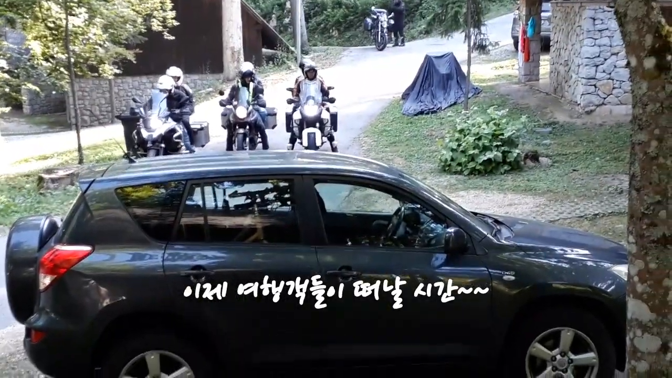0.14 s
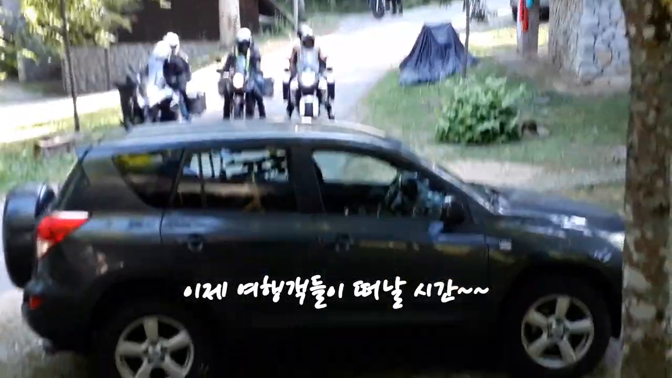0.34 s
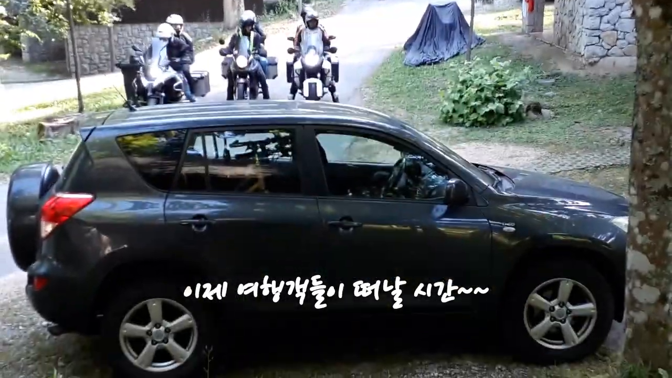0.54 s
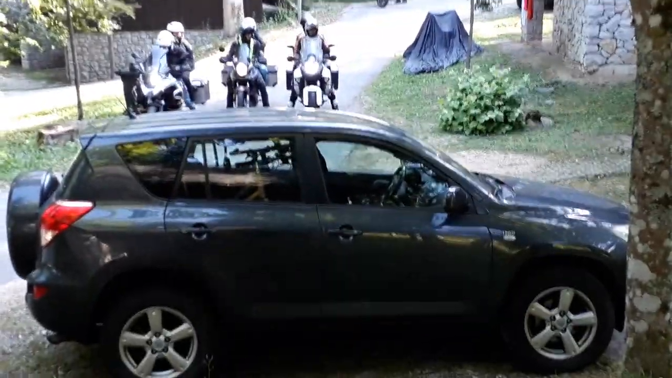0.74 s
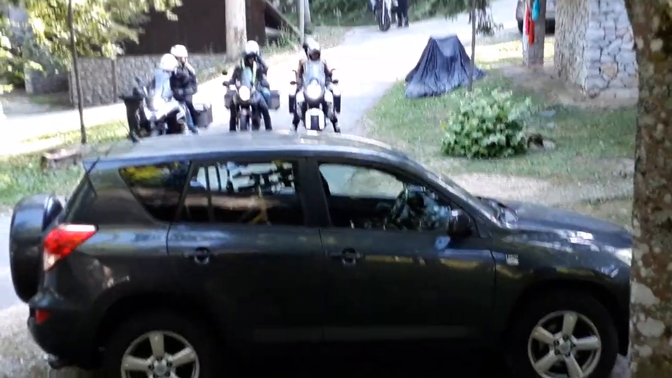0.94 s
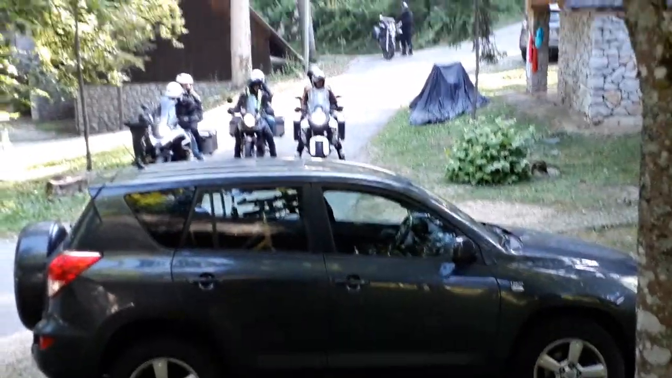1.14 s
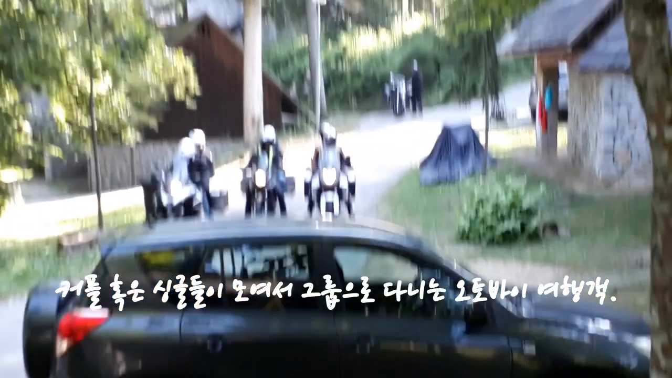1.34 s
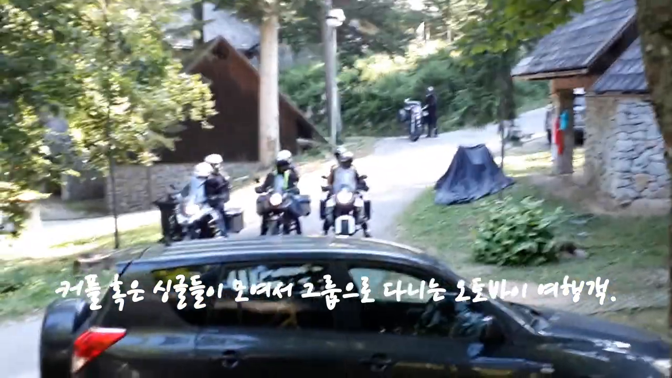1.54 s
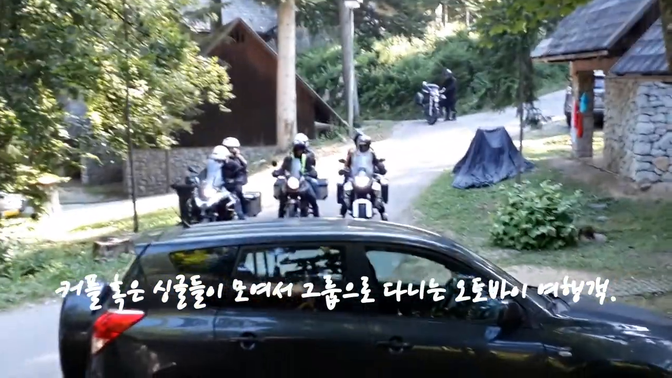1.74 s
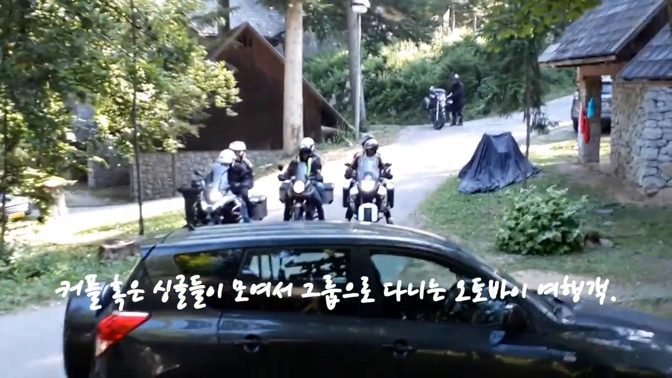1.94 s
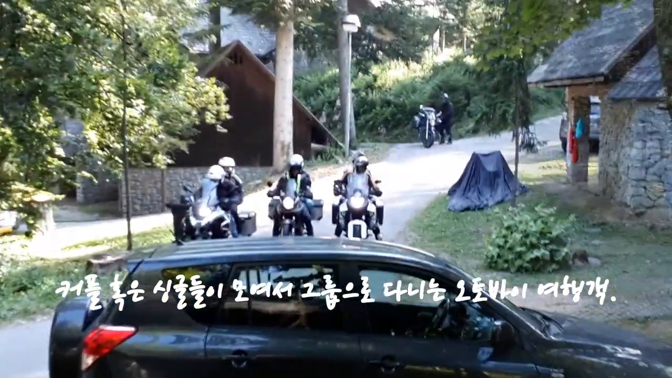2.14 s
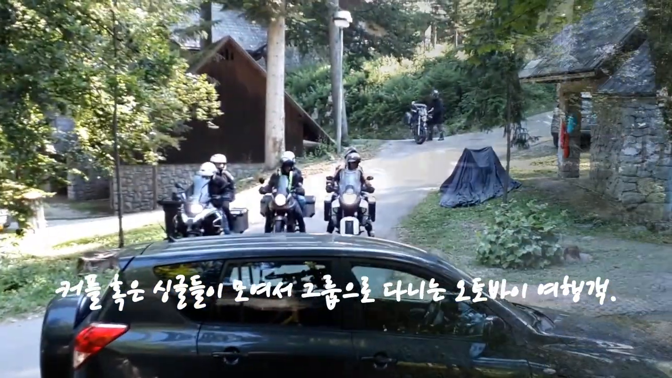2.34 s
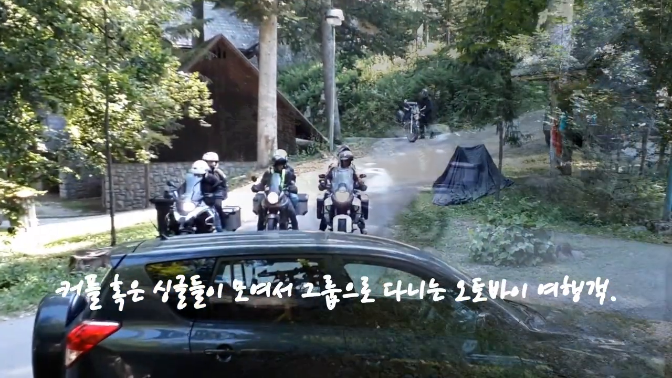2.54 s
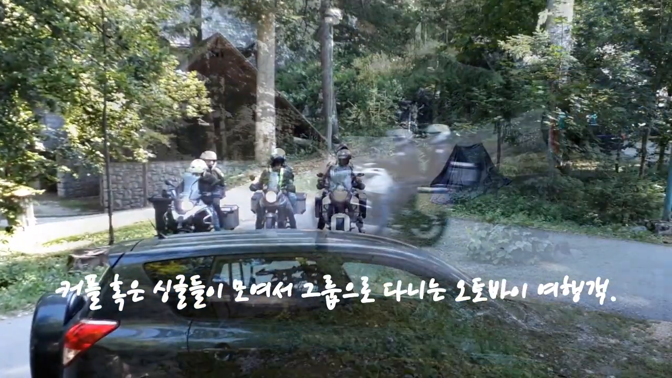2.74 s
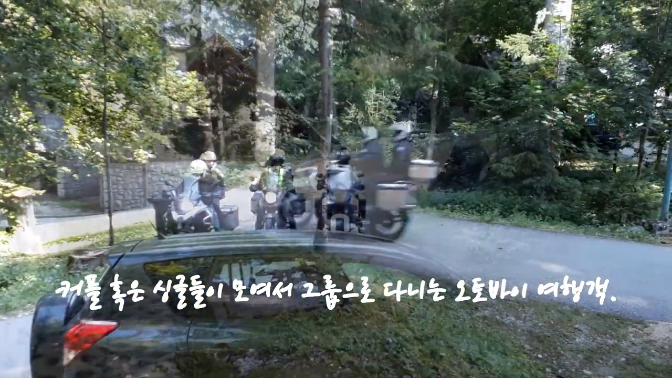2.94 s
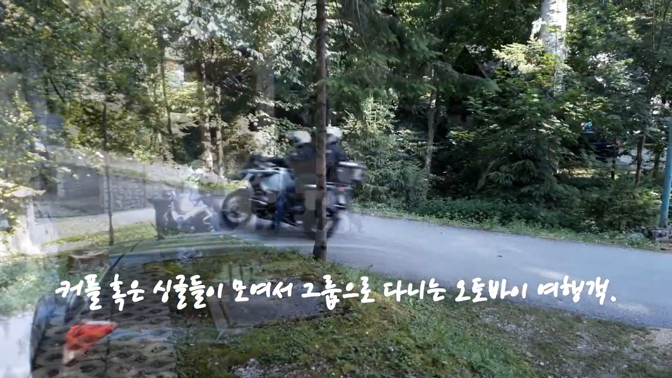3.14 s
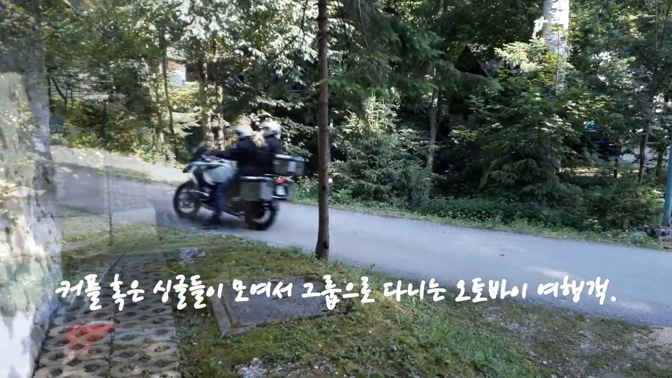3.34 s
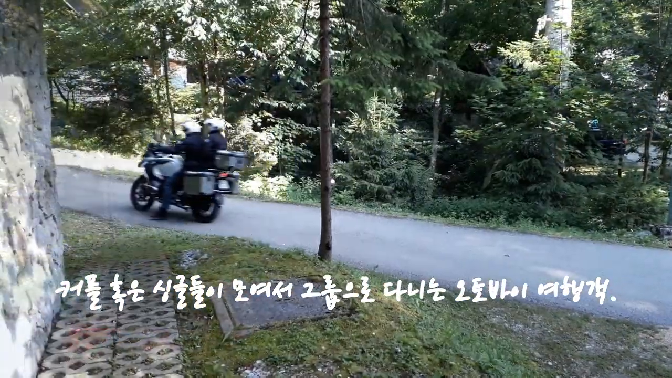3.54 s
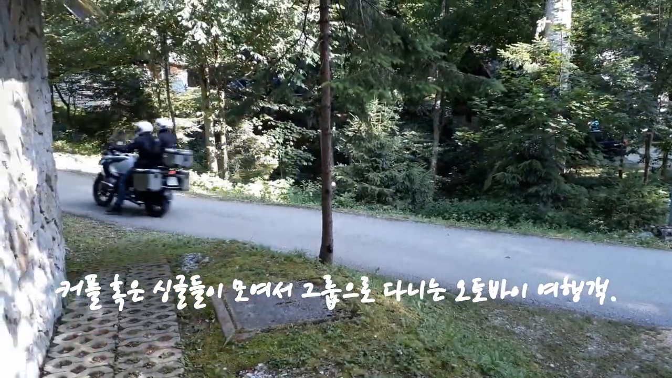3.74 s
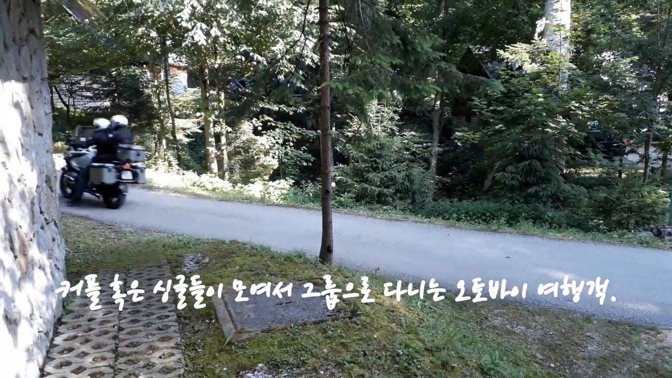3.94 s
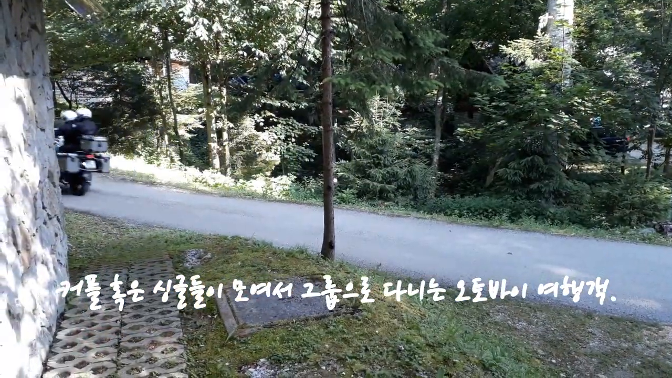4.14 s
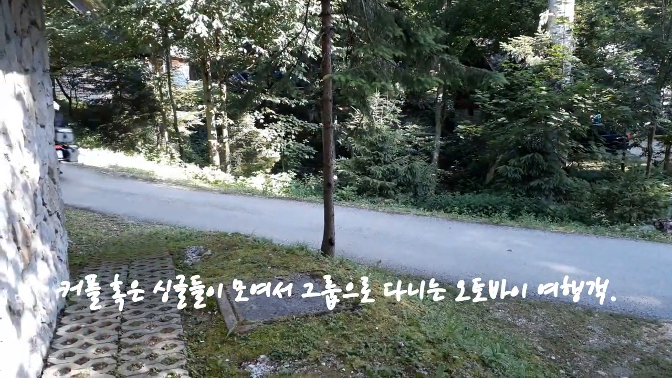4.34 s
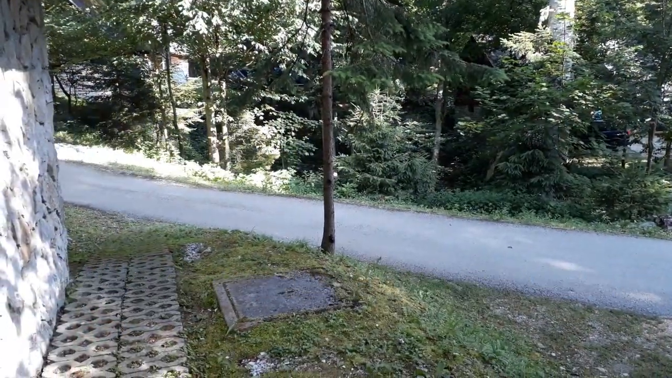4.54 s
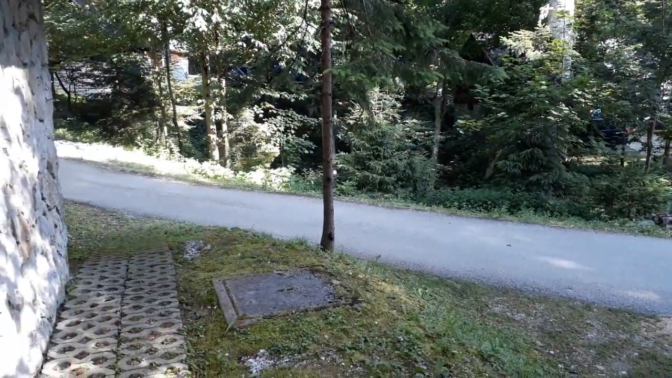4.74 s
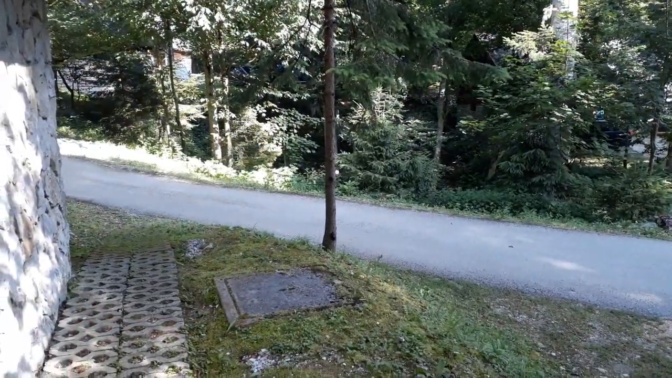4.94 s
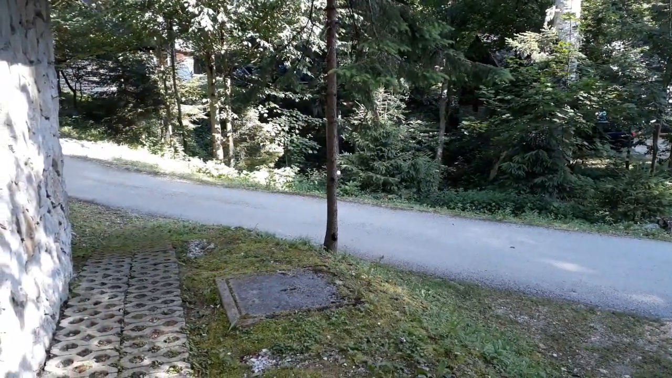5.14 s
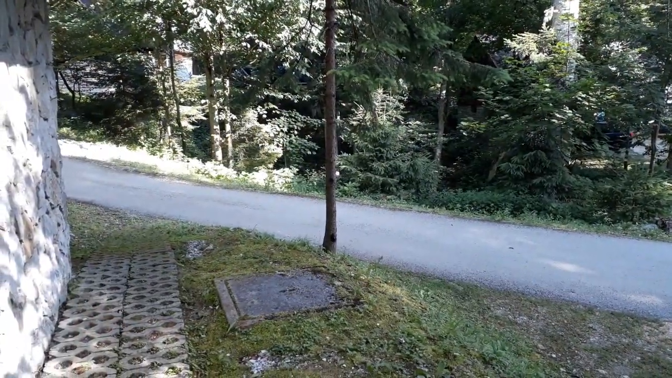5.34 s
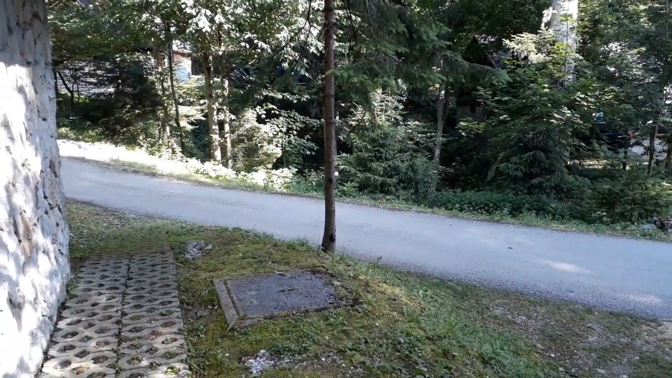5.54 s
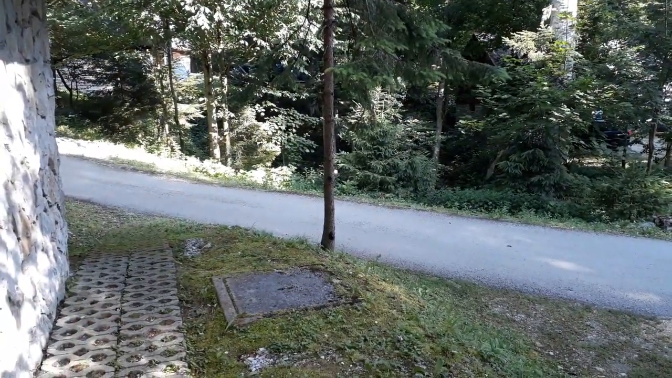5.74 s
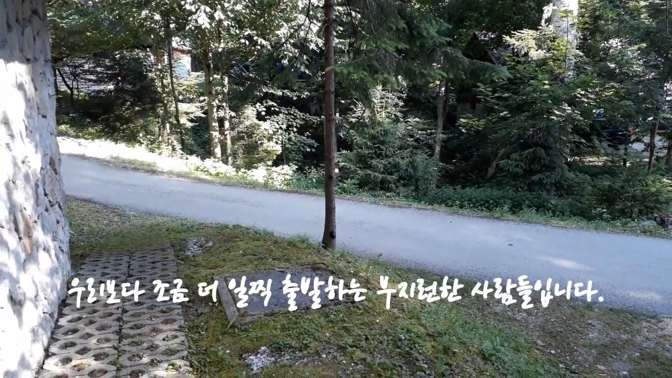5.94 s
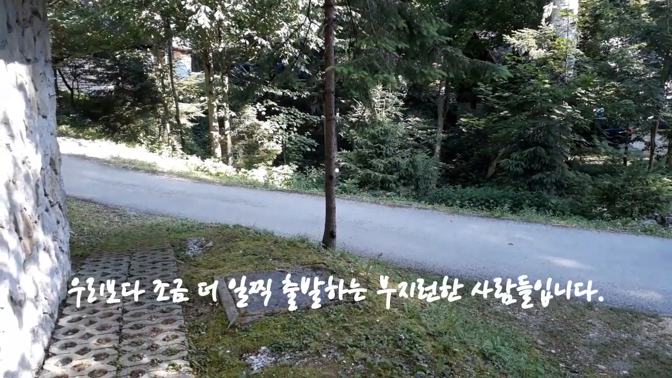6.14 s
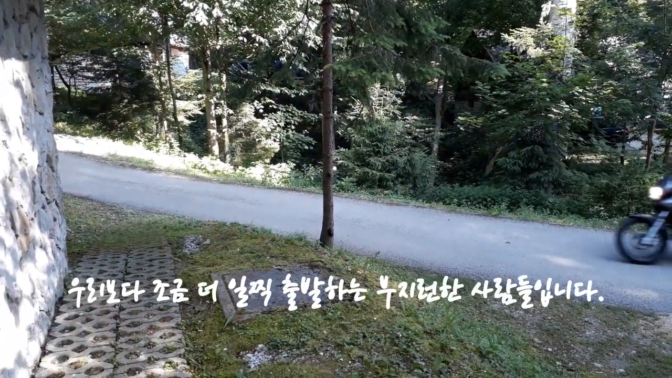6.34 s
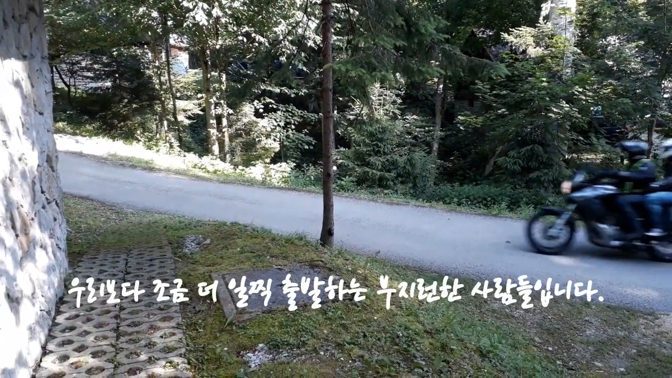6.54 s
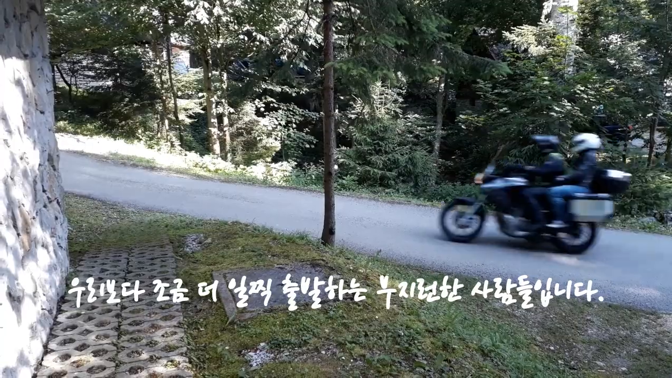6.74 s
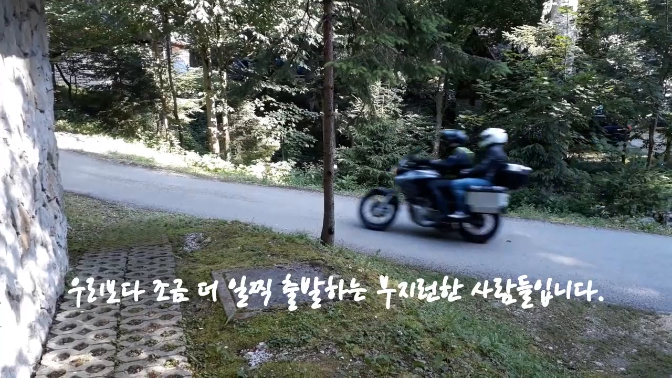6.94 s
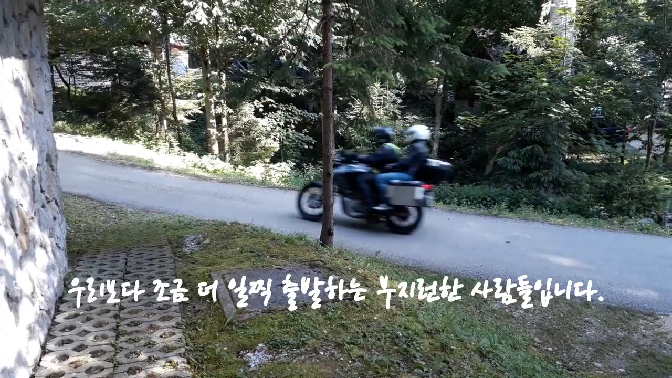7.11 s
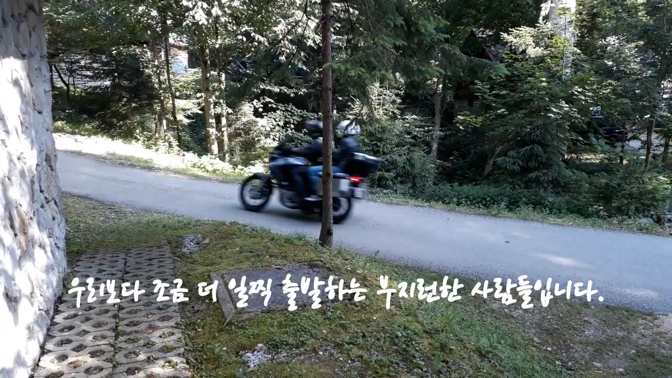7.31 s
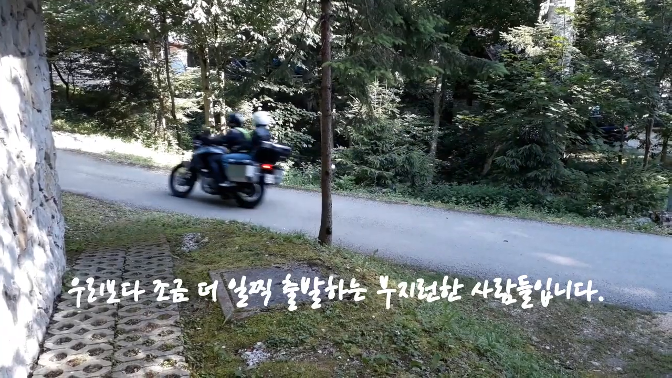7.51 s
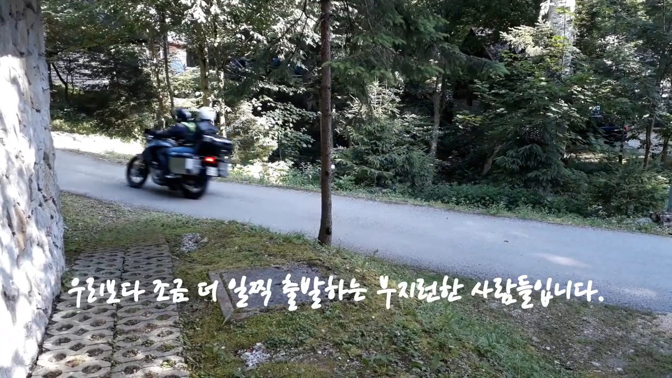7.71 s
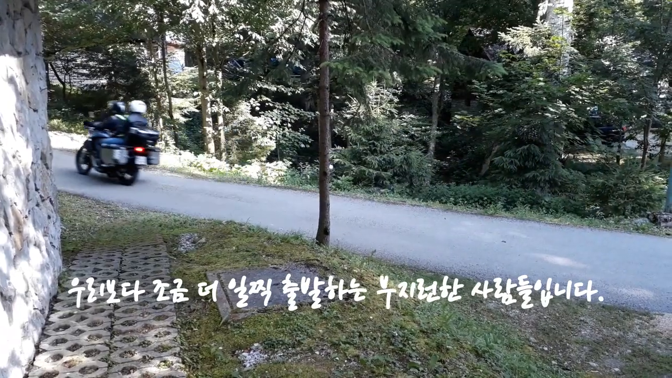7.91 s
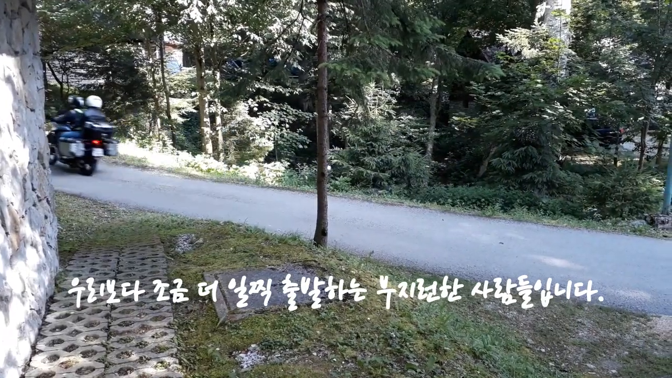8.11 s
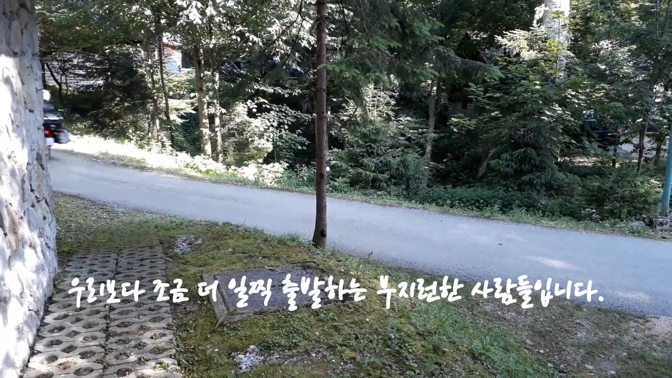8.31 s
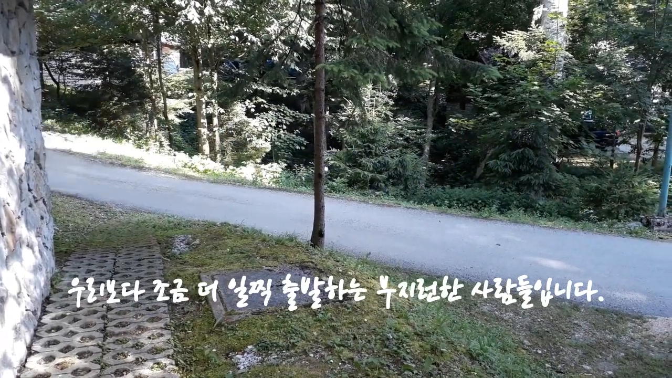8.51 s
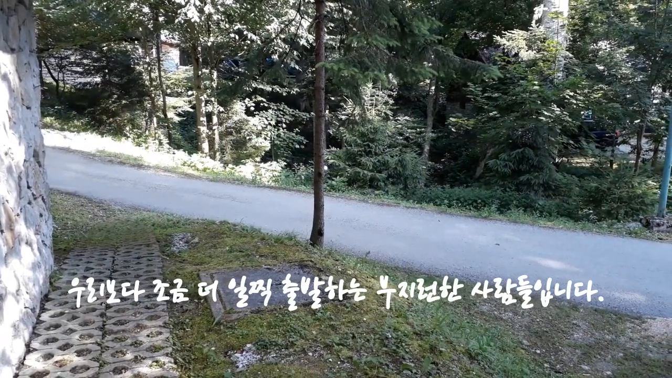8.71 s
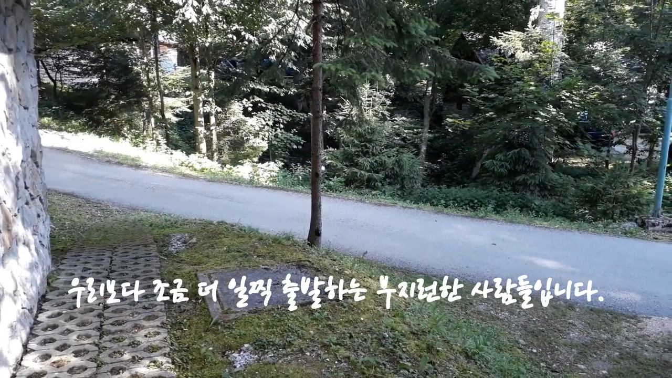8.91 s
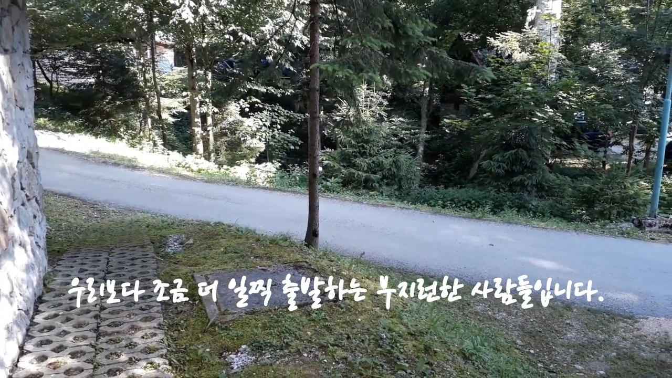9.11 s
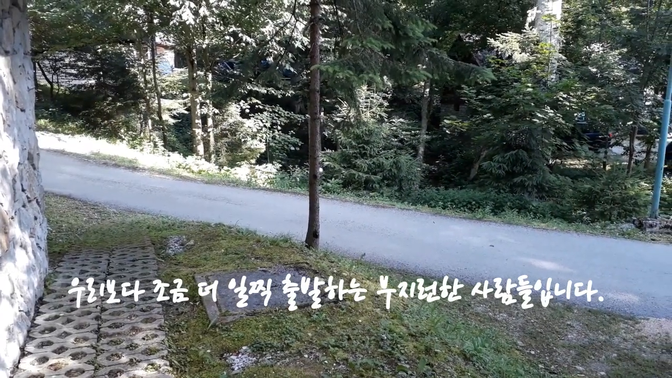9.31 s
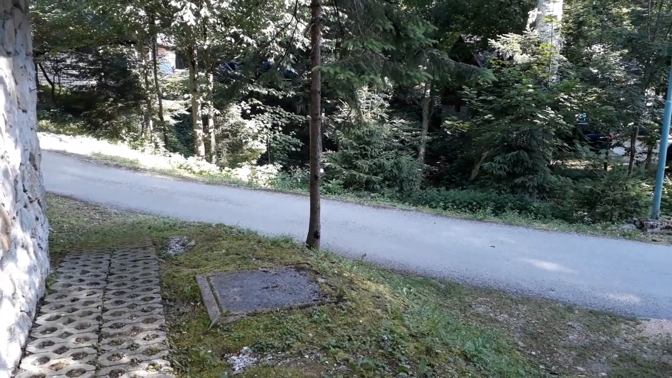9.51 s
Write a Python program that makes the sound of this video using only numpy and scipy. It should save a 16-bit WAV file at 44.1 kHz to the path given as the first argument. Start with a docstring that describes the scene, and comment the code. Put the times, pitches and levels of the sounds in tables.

```python
"""Wooded campsite: three touring motorcycles idle; the sound dulls and fades into a short silence. In a second
scene a flat twin pulls away and a V-twin follows, accelerating past and opening its throttle. Exhausts are
summed firing harmonics plus gas noise; roar, hiss and clatter are coloured pulsed noise. Each bike is loudest
when nearest and rougher from afar. Another engine rumbles behind them. Small birds chirp throughout as gliding
sines, over a faint outdoor rumble of filtered noise."""
import sys
import numpy as np
from scipy import signal
from scipy.fft import rfft, irfft, next_fast_len
from scipy.io import wavfile
from scipy.ndimage import uniform_filter1d

SR = 44100
rng = np.random.default_rng(int(sys.argv[2]) if len(sys.argv) > 2 else 0)


def unload_wav(signal):
    """Save mono or channel-first audio to the path in sys.argv[1] as 16-bit WAV at rate SR, clipped to [-1, 1]."""
    wavfile.write(
        sys.argv[1],
        SR,
        np.round(np.clip(np.atleast_2d(signal).T, -1, 1) * 32767).astype(np.int16),
    )


N = 422037
T = np.arange(N) / SR
SILENCE_S = (2.885, 3.208)  # start, end

# flat twin speed: time_s, firings_hz
FLAT_SPEED = [(3.25, 36.2), (4.28, 40.6), (5.16, 41.4), (5.29, 39.8), (6.4, 36.9)]
# V-twin speed: time_s, cycles_hz
VEE_SPEED = [(6.1, 18.5), (6.23, 18.0), (6.76, 20.9), (7.93, 25.7), (8.46, 27.8), (8.98, 27.8),
             (9.57, 26.1)]
# exhaust harmonics, one row per speed multiple from 2 up: side_rel_db, rear_rel_db, far_rel_db
FLAT_ORDERS = [(-10.0, -10.0, -12.0), (-0.0, -2.0, -6.0), (-6.0, -12.0, -19.0), (-15.0, -15.0, -18.0),
               (-7.0, -15.0, -23.0), (-20.0, -22.0, -27.0), (-23.0, -25.0, -28.0), (-13.0, -17.0, -22.0),
               (-20.0, -26.0, -32.0), (-27.0, -18.0, -43.0), (-31.0, -34.0, -31.0), (-41.0, -38.0, -40.0),
               (-37.0, -49.0, -35.0)]
VEE_ORDERS = [(-39.0, -41.0, -35.0), (-32.0, -14.0, -13.0), (-15.0, -5.0, -8.0), (-12.0, -4.0, -14.0),
              (-2.0, -10.0, -11.0), (-3.0, -10.0, -15.0), (-18.0, -22.0, -21.0), (-16.0, -14.0, -30.0),
              (-13.0, -23.0, -28.0), (-11.0, -11.0, -21.0), (-12.0, -20.0, -17.0), (-19.0, -26.0, -28.0),
              (-21.0, -12.0, -21.0), (-19.0, -18.0, -29.0), (-14.0, -19.0, -20.0), (-27.0, -16.0, -30.0),
              (-20.0, -16.0, -29.0), (-29.0, -21.0, -34.0), (-20.0, -19.0, -27.0), (-26.0, -26.0, -40.0),
              (-22.0, -23.0, -47.0), (-18.0, -28.0, -33.0)]
# silencer bands that lift or cut passing harmonics: centre_hz, half_width_hz, lift_db
VEE_CHAMBERS = [(252, 16, 5), (293, 20, -5), (345, 15, 7)]
# exhaust passes, before burst and wall: nearest_s, half_power_before_s, half_power_after_s, peak_db
FLAT_BOOM, FLAT_BARK = (3.5, 3, 1.25, -24.5), (3.5, 3, 0.68, -30.5)
VEE_BOOM, VEE_BARK = (6.76, .24, .92, -23.4), (6.86, .42, .9, -29.8)
# pipe direction: side_until_s, rear_at_s, far_from_s
FLAT_TURN_S, VEE_TURN_S = (3.57, 4.34, 5.4), (7.02, 7.6, 8.6)
# noise share when nearest; time from the pass until half the rest is scattered
FLAT_ROUGH, FLAT_SCATTER_S, VEE_ROUGH, VEE_SCATTER_S = 0.06, 1.7, 0.09, 3.5
VEE_SECOND = .435  # second firing, share of the cycle
# start, end of V-twin coming into earshot; of its taking over; of its slipping behind a stone wall
ARRIVING_S, HANDOVER_S, BEHIND_WALL_S = (5.3, 6.0), (6.1, 6.5), (7.56, 9.8)
WALL_BARK_DB, WALL_ROAR_DB = -9, -7
# throttle burst: centre, half length to 1/e, added bark
BURST_S, BURST_HALF_S, BURST_BARK_DB = 7.88, 0.57, 3
FRAME_RING_S = .035  # decay constant


def riding():
    """The flat twin leaves as the V-twin arrives, opens its throttle and slips behind a wall."""
    flat_turns = revolve(curves(FLAT_SPEED)[0], wobble=.002)
    vee_turns = revolve(curves(VEE_SPEED)[0], wobble=.0025)
    flat = firings(flat_turns / 2, .5, -0.87, uneven_db=2.5)
    vee = firings(vee_turns, VEE_SECOND, -3.0, uneven_db=3.0)
    handover, hidden = ramp(*HANDOVER_S), ramp(*BEHIND_WALL_S)
    burst = np.exp(-((T - BURST_S) / BURST_HALF_S) ** 2)

    flat_rough = roughness(FLAT_BARK[0], FLAT_ROUGH, FLAT_SCATTER_S)
    leaving = silencer(flat_turns, 0, flat, FLAT_ORDERS, swell(*FLAT_BOOM), swell(*FLAT_BARK),
                       flat_rough, FLAT_TURN_S, waver_db=1.5, smear=0.55)

    vee_bark_db = swell(*VEE_BARK) + BURST_BARK_DB * burst + WALL_BARK_DB * hidden
    vee_rough = roughness(VEE_BARK[0], VEE_ROUGH, VEE_SCATTER_S)
    passing = silencer(vee_turns, VEE_SECOND, vee, VEE_ORDERS, swell(*VEE_BOOM), vee_bark_db,
                       vee_rough, VEE_TURN_S, waver_db=1.5, smear=0.6, chambers=VEE_CHAMBERS)

    pulses = (1 - handover) * flat + handover * vee
    # sharp firing edges, scattered by the frame, give the roar its pitch
    frame = rng.standard_normal(SR) * np.exp(-T[:SR] / FRAME_RING_S)
    rasp = evened(signal.oaconvolve(pulses, frame)[:N])
    throttle = gain_of(WALL_ROAR_DB * hidden) * handover * (honk(vee) + growl(vee_turns))
    exhausts = np.sqrt(1 - handover) * leaving + ramp(*ARRIVING_S) * passing
    return exhausts + whines(rasp) + throttle + lane_noise(pulses, rasp, burst, hidden)


# rough gas colour: freq_hz, rel_db
ROUGH_PIPE = [(20, -31), (40, -26), (55, -21.5), (75, -6), (100, -1), (135, -2), (165, -2), (190, -13),
              (255, -2), (295, -9.5), (345, -6), (480, -15), (590, -15.5), (900, -39)]
PIPE_SPREAD_RAD = 6.0  # lag per log multiple: the ringing pipe spreads each firing in time


def silencer(turns, second, pulses, orders, boom_db, bark_db, rough, turn_s, waver_db, smear, chambers=()):
    """Firing harmonics plus rough gas puffs, split into a low boom and a bark with their own levels."""
    knots_s, tone = np.arange(0, T[-1] + 1, .13), np.zeros(N)
    speed_hz = np.gradient(turns, 1 / SR)
    for k, views_db in enumerate(orders, 2):
        # paths through the trees make each harmonic waver and shift
        waver, shift = wander(knots_s), wander(knots_s)
        db = np.interp(T, turn_s, views_db) + waver_db * waver
        db = db + sum(lift / (1 + ((k * speed_hz - hz) / width) ** 2) for hz, width, lift in chambers)
        # late second cylinder, then the pipe's delay of the low notes
        second_lag = np.angle(1 + .5 * np.exp(2j * np.pi * k * second))
        lag = second_lag + PIPE_SPREAD_RAD * np.log(k)
        tone += gain_of(db) * np.cos(2 * np.pi * k * turns - lag + smear * shift)
    gas = woods(colour(puffs(pulses, decay_s=0.015, share=0.67), ROUGH_PIPE), wet_db=-8.0)
    out = np.zeros(N)
    for db, clean, noisy in zip((boom_db, bark_db), split(tone, 180), split(gas, 200)):
        mix = np.sqrt(1 - rough) * steady(clean) + np.sqrt(rough) * steady(noisy)
        out += gain_of(db) * mix
    return out


def roughness(nearest_s, close, scatter_s):
    """The further a bike is, the more of its note the trees scatter into noise."""
    return np.clip(1 - (1 - close) / (1 + ((T - nearest_s) / scatter_s) ** 2), 0, 1)


# noise colours: freq_hz, rel_db
ROAR = [(480, -7), (590, -10), (720, -6), (870, -6.5), (1020, -4.5), (1330, -6.5), (1600, -10), (1800, -14)]
HISS = [(710, -12), (1200, -9.5), (1520, -5.5), (1660, -6), (1800, -3), (3080, -4.5), (4580, -8),
        (6190, -15.5), (7830, -28), (9500, -33.5), (10500, -28), (11500, -28.5), (13400, -33), (15600, -40)]
# engine and tyre noise, one row per bike, before burst and wall:
# nearest_s, half_power_before_s, half_power_after_s, roar_db, hiss_db, sizzle_db
PASSES = [(3.72, 0.74, 0.44, -44, -40, -58), (6.77, 0.4, 0.55, -35.5, -36, -48)]
SIZZLE_LEAD_S = 0.16  # sizzle is thrown forward, so it peaks early
BURST_ROAR_DB, BURST_HISS_DB = 0.5, 3.5
# same noise from up the lane, before burst and wall
FAR_ROAR_DB, FAR_HISS_DB, FAR_SIZZLE_DB = -50.5, -48, -54.5
# next engine's hiss comes out from behind the trees: start, end; full levels before burst
EMERGING_S, NEXT_HISS_DB, NEXT_SIZZLE_DB = (8.7, 8.86), -49, -55


def lane_noise(pulses, rasp, burst, hidden):
    """Roar, hiss and top sizzle swell with each pass and throb with the nearer engine."""
    emerging_db = 20 * np.log10(ramp(*EMERGING_S) + 1e-6)
    roars_db = [FAR_ROAR_DB]
    hisses_db = [FAR_HISS_DB, NEXT_HISS_DB + emerging_db]
    sizzles_db = [FAR_SIZZLE_DB, NEXT_SIZZLE_DB + emerging_db]
    for s, before, after, roar_db, hiss_db, sizzle_db in PASSES:
        roars_db.append(swell(s, before, after, roar_db))
        hisses_db.append(swell(s, before, after, hiss_db))
        sizzles_db.append(swell(s - SIZZLE_LEAD_S, before, after, sizzle_db))

    roar = colour(puffs(pulses, decay_s=0.012, share=0.15) + rasp, ROAR)
    rush = puffs(pulses, decay_s=0.0077, share=0.067) + gain_of(-9.0) * rasp
    hiss, sizzle = split(colour(rush, HISS), 5120)
    roar_gain = together(*roars_db) * gain_of(BURST_ROAR_DB * burst + WALL_ROAR_DB * hidden)
    hiss_gain = together(*hisses_db) * gain_of(BURST_HISS_DB * burst)
    return roar_gain * roar + hiss_gain * evened(hiss) + together(*sizzles_db) * evened(sizzle)


# growl harmonics: speed_multiple, rel_db
GROWL_ORDERS = [(24, 0), (26, -2), (28, -7), (30, -1), (33, 0), (35, -4), (38, -3), (42, -9), (47, -2),
                (52, -8), (60, -10)]
GROWL_WAVER_DB = 4
# nearest_s, half_power_before_s, half_power_after_s, peak_db before the wall
GROWL_SWELL = (6.88, .4, .38, -34.3)


def growl(turns):
    """High V-twin harmonics climb with speed; lane echoes make each swell and fade on its own."""
    knots_s, stack = np.arange(0, T[-1] + 1, .17), np.zeros(N)
    for k in range(GROWL_ORDERS[0][0], GROWL_ORDERS[-1][0]):
        waver, shift = wander(knots_s), wander(knots_s)
        db = np.interp(k, *np.transpose(GROWL_ORDERS)) + GROWL_WAVER_DB * waver
        stack += gain_of(db) * np.cos(2 * np.pi * (k * turns + rng.random()) + .5 * shift)
    return gain_of(swell(*GROWL_SWELL)) * steady(stack)


# airbox colour: freq_hz, rel_db
AIRBOX = [(330, -10), (400, -2), (450, 0), (520, -2), (560, -14)]
# loudest_s, half_power_before_s, half_power_after_s, peak_db before the wall; then rushing-air ratio
HONK_SWELL, HONK_AIR = (7.66, .11, .4, -33), .25


def honk(pulses):
    """With the throttle open, each gulp of air rings the V-twin's airbox."""
    gulps = pulses + HONK_AIR * np.std(pulses) * puffs(pulses, decay_s=.008, share=.7)
    return gain_of(swell(*HONK_SWELL)) * steady(woods(colour(gulps, AIRBOX), wet_db=-7))


# gear and casing whines, before/after as Gaussian sigmas:
# pitch_hz, climb_hz_per_s, width_hz, loudest_s, before_s, after_s, level_db
WHINES = [(482, 20, 16, 6.35, .75, .25, -42), (680, 55, 110, 5.1, .8, .5, -48.5),
          (1020, 50, 90, 5.25, .9, .45, -52.5), (600, 20, 9, 5.85, .18, .18, -50),
          (545, 20, 14, 6.45, .3, .2, -46), (760, 170, 110, 7.22, .15, .1, -43),
          (1380, 0, 70, 6.65, .15, .12, -46), (1700, 0, 70, 6.28, .06, .08, -49),
          (1620, 200, 70, 7.88, .06, .17, -43.5), (2030, 100, 60, 7.85, .04, .09, -44)]


def whines(rasp):
    """Gears and casings sing in narrow beams: each resonance holds or climbs, swells and is gone."""
    out = np.zeros(N)
    for hz, climb, width, s, before, after, db in WHINES:
        beam = np.exp(-.5 * ((T - s) / np.where(T < s, before, after)) ** 2)
        drive = rng.standard_normal(N) + rasp
        pitch_hz = hz + climb * np.clip(T - s, -2, 2)
        out += gain_of(db) * beam * steady(resonate(drive, pitch_hz, width))
    return out


# idling engines: cycles_hz, second_firing_share_of_cycle, rel_db
IDLERS = [(9.7, .5, -3), (11.8, .43, 0), (10.55, 0.34, -5.5)]
# exhaust and valve gear colours: freq_hz, rel_db
IDLE_PIPE = [(25, -31), (42, -12), (60, -2), (80, 0.5), (95, -0.5), (106, -5), (128, 2), (158, 0),
             (181, -12), (203, -5), (232, -3.5), (258, -6), (283, -17), (335, -10), (375, -15), (435, -12),
             (470, -22), (640, -30)]
CLATTER = [(280, -9), (480, -8), (701, -12), (776, -15), (872, 1.5), (965, -5.5), (1050, -3.5), (1310, -9),
           (1970, -5), (2410, -7.5), (3000, -6), (3680, -8), (4700, -9.5), (7410, -12.5), (8300, -18.5),
           (9490, -24), (10500, -21), (13000, -21.5), (15600, -27)]
# casing resonances: freq_hz, width_hz, level_db before CASINGS_TRIM_DB
CASINGS = [(412.8, 19, -50.5), (543, 58, -57.5), (701, 46, -58.5), (882, 95, -56.5), (1038, 43, -60.5),
           (1548, 32, -61), (1957, 79, -56.5), (2968, 70, -61.5)]
IDLE_EXHAUST_DB, IDLE_CLATTER_DB, CASINGS_TRIM_DB = -34, -43.5, -1.5
# before the dulling; pump is a mean that flickers
IDLE_SIZZLE_DB, PUMP_DB, PUMP_HZ = -54.5, -63.5, 7660
# top treble dulls: start, end; total change
DULLING_S, DULL_DB = (1.87, 2.1), -4.5


def idling():
    """Three slow twins beat together; valve gear clatters, casings ring, a fuel pump whistles."""
    pulses = np.zeros(N)
    for hz, second, db in IDLERS:
        pulses += gain_of(db) * firings(revolve(hz, wobble=.03), second, -1.5, uneven_db=3.3)
    exhaust = steady(woods(colour(pulses, IDLE_PIPE), wet_db=-9))
    rattle = woods(puffs(pulses, decay_s=0.004, share=0.11), wet_db=-14.0)
    clatter, sizzle = split(colour(rattle, CLATTER), 5530)
    knocks = puffs(pulses, decay_s=0.0097, share=0.69)
    casings = sum(gain_of(db) * resonate(knocks, hz, width) for hz, width, db in CASINGS)
    pump = gain_of(PUMP_DB + 2 * drift(25)) * resonate(rng.standard_normal(N), PUMP_HZ, 80)
    top = gain_of(DULL_DB * ramp(*DULLING_S)) * (gain_of(IDLE_SIZZLE_DB) * evened(sizzle) + pump)
    low = gain_of(IDLE_EXHAUST_DB) * exhaust + gain_of(IDLE_CLATTER_DB) * evened(clatter)
    return low + gain_of(CASINGS_TRIM_DB) * casings + top


# exhaust colour: freq_hz, rel_db
BEHIND_PIPE = [(30, -68), (60, -9), (95, -1.5), (130, 6.5), (160, 1), (195, -4.5), (255, 0.5), (290, -7),
               (345, -16), (440, -19.5), (560, -35.5), (900, -22.5), (2000, -34.5)]
# cycle rate at the end of the silence, steady climb, level
BEHIND_CYCLE_HZ, BEHIND_HZ_PER_S, BEHIND_DB = 12.2, 1.1, -36


def behind():
    """A further twin rumbles through the trees, gathering speed: pulses through a pipe colour."""
    cycle_hz = BEHIND_CYCLE_HZ + BEHIND_HZ_PER_S * (T - SILENCE_S[1])
    pulses = firings(revolve(cycle_hz, wobble=.02), .42, 0.52, uneven_db=1.0)
    return gain_of(BEHIND_DB) * steady(woods(colour(pulses, BEHIND_PIPE), wet_db=-9.0))


# clear notes: start_s, length_s, start_hz, end_hz, level_db
BIRDS = [(0.122, .03, 4800, 4700, -48), (0.207, .03, 4550, 4250, -52), (.24, 0.073, 2850, 3380, -50),
         (.40, .045, 4850, 4470, -49), (.42, 0.049, 2620, 3100, -54), (.565, .045, 4650, 4800, -51),
         (0.607, 0.066, 2870, 3440, -50), (0.761, 0.037, 4820, 4550, -52), (.79, 0.078, 2750, 3380, -51),
         (1.395, .08, 6330, 6240, -51), (1.452, 0.046, 2900, 3380, -49), (1.58, .03, 4850, 4320, -45.5),
         (1.83, .06, 8100, 8200, -60), (2.219, 0.022, 3990, 3850, -39), (2.36, 0.043, 3830, 3650, -45),
         (2.492, 0.068, 3650, 3770, -46), (4.505, 0.053, 4680, 4760, -48), (5.505, 0.037, 3850, 4190, -48),
         (5.613, 0.044, 2950, 2770, -42), (5.66, 0.052, 2450, 2920, -41), (5.807, .09, 3590, 3700, -44),
         (6.142, 0.049, 3120, 3020, -38), (6.311, 0.067, 2770, 3020, -41), (6.342, .12, 3950, 4200, -46),
         (6.479, 0.096, 4220, 4000, -46), (6.491, 0.12, 3170, 2920, -40), (6.627, 0.08, 3220, 3300, -45),
         (6.667, .067, 2550, 2880, -42), (6.785, 0.084, 3280, 3390, -43), (6.92, .1, 4376, 3570, -39),
         (7.428, .035, 2630, 2740, -40), (7.488, 0.05, 3430, 3440, -36.5), (7.604, 0.046, 3240, 3220, -37),
         (7.747, 0.054, 3980, 3880, -41), (7.88, .042, 3150, 2880, -43), (7.909, .07, 2465, 2900, -39),
         (8.204, 0.055, 3040, 3290, -40), (8.251, .05, 2900, 2530, -41), (8.384, 0.049, 3330, 3040, -42),
         (8.47, 0.056, 2220, 2510, -45)]
BIRD_ARCH = .01  # pitch arch, share of pitch
# fainter twitter from deeper in the trees: rate, note length, centre pitch, level
TWITTER_PER_S, TWITTER_NOTE_S, TWITTER_HZ, TWITTER_DB = 1.5, 0.062, 3400, -54.5


def birds():
    """Short whistles glide in an arch with a quick warble, smeared by the trees."""
    song, warble = np.zeros(N), 1 + .016 * drift(150)
    twitter = []
    for when, pitch, glide in rng.random((round(TWITTER_PER_S * T[-1]), 3)):
        start_s = when * (T[-1] - 2 * TWITTER_NOTE_S)
        start_hz = TWITTER_HZ * 2 ** (pitch - .5)
        end_hz = start_hz * 2 ** (0.255 * (glide - .5))
        twitter.append((start_s, TWITTER_NOTE_S, start_hz, end_hz, TWITTER_DB))
    for s, length, start_hz, end_hz, db in BIRDS + twitter:
        at = np.arange(round(s * SR), round((s + length) * SR))
        u = np.linspace(0, 1, len(at))
        glide_hz = start_hz + (end_hz - start_hz) * u
        hz = glide_hz * (1 + BIRD_ARCH * np.sin(np.pi * u)) * warble[at]
        note = np.sin(2 * np.pi * np.cumsum(hz) / SR) * signal.windows.tukey(len(at), .5)
        song[at] += gain_of(db) * note
    return woods(song, wet_db=-4.5)


# rumble colour: freq_hz, rel_db
FLOOR = [(15, -28), (25, -24), (42, 5.5), (70, -6), (150, -9)]


def outdoor_rumble():
    """Faint outdoor rumble: steady noise with a low colour."""
    return gain_of(-56.0) * colour(rng.standard_normal(N), FLOOR)


# scatter decay: freq_hz, t60_s
WOODS = [(100, 0.68), (1000, 0.56), (4000, 0.23), (12000, 0.044)]


def woods(x, wet_db):
    """Adds the scatter from trunks and huts: sparse taps that die band by band."""
    taps = rng.choice([-1., 1.], SR) * (rng.random(SR) < 2000 / SR) * (T[:SR] > .012)
    hz, t, z = signal.stft(taps, SR, nperseg=256)
    decay = gain_of(-60 * t / read(WOODS, hz)[:, None])
    tail = signal.istft(z * decay, SR, nperseg=256)[1]
    return x + gain_of(wet_db) * signal.oaconvolve(x, tail / np.linalg.norm(tail))[:N]


def revolve(cycle_hz, wobble):
    """Engine cycles counted from a random start, at a slightly unsteady speed."""
    return np.cumsum(cycle_hz * (1 + wobble * drift(9))) / SR + rng.random()


def firings(turns, second, second_db, uneven_db):
    """One pulse for each of two cylinders per cycle; no two burns are equally strong."""
    first, other = (np.diff(np.floor(turns - lag), prepend=np.floor(turns[0] - lag))
                    for lag in (0, second))
    return (first + gain_of(second_db) * other) * gain_of(uneven_db * rng.standard_normal(N))


def puffs(pulses, decay_s, share):
    """Turbulent noise, of which a share surges after each pulse."""
    surge = evened(signal.lfilter([1], [1, -np.exp(-1 / (decay_s * SR))], pulses))
    share = np.clip(share, 0, 1)
    return rng.standard_normal(N) * np.sqrt(1 - share + share * surge ** 2)


def swell(s, before, after, db):
    """Level in dB of a source going by: inverse distance, with its own pace coming and going."""
    return db - 10 * np.log10(1 + ((T - s) / np.where(T < s, before, after)) ** 2)


def together(*levels_db):
    """Amplitude of unrelated sounds heard at once."""
    return np.sqrt(sum(gain_of(db) ** 2 for db in levels_db))


def resonate(x, hz, width):
    """A steep resonance that can follow a curve: shift to zero, lowpass twice, shift back."""
    turn = np.exp(2j * np.pi * np.cumsum(hz * np.ones(N)) / SR)
    r = np.exp(-np.pi * width / SR)
    return evened((turn * signal.lfilter([1 - r], np.poly([r, r]), x / turn)).real)


def colour(x, points, size=8192):
    """Causal filter with the given spectrum, falling steeply beyond its ends; unit rms out."""
    hz = abs(np.fft.fftfreq(size, 1 / SR)) + 1
    octaves_out = abs(np.log2(hz / np.clip(hz, points[0][0], points[-1][0])))
    log_gain = np.log(gain_of(np.maximum(read(points, hz) - 30 * octaves_out, -100)))
    # minimum phase from the log gain
    ring = np.fft.ifft(np.exp(np.conj(signal.hilbert(log_gain)))).real[:size // 2]
    return evened(signal.oaconvolve(x, ring)[:N])


def lowpass(x, hz, order):
    """Keeps what lies below a frequency, without delay."""
    size = next_fast_len(N)
    return irfft(rfft(x, size) / (1 + (np.fft.rfftfreq(size, 1 / SR) / hz) ** order), size)[:N]


def split(x, hz):
    """The parts below and above a frequency."""
    low = lowpass(x, hz, order=16)
    return low, x - low


def drift(hz):
    """Slow chance of unit rms."""
    return evened(lowpass(rng.standard_normal(N), hz, order=4))


def wander(knots_s):
    """Random values at the knots, joined by straight lines."""
    return np.interp(T, knots_s, rng.standard_normal(len(knots_s)))


def steady(x, size=13000):
    """Holds the slow level at one and keeps the single beats."""
    power = uniform_filter1d(uniform_filter1d(x ** 2, size), size // 2)
    return x / np.sqrt(abs(power) + 1e-12)


def evened(x):
    """Scales to unit rms."""
    return x / np.sqrt(np.mean(x ** 2) + 1e-20)


def read(points, hz):
    """A spectrum joined on a log-frequency axis."""
    f, value = np.transpose(points)
    return np.interp(np.log(hz + 1), np.log(f + 1), value)


def curves(rows):
    """Each column of a table as a curve over time."""
    s, *columns = np.transpose(rows)
    return [np.interp(T, s, c) for c in columns]


def ramp(start, end):
    """Rises from 0 to 1 between two times."""
    return np.clip((T - start) / (end - start), 0, 1)


def gain_of(db):
    """Decibels to amplitude."""
    return 10 ** (np.asarray(db) / 20)


def scene():
    """The idling group first, then the ride down the lane; birds and rumble under both."""
    rumble = outdoor_rumble()
    engines = np.where(T < np.mean(SILENCE_S), idling(), riding() + behind())
    return (engines + birds() + rumble)[None]


FADE_FROM_S, FADE_DB_PER_S, FADE_IN_S, EDGE_HZ = 1.94, 7, 0.3, 15720


def record(dry):
    """The first scene fades and shuts off, the second fades in; then the band limit."""
    shut_s, reopen_s = SILENCE_S
    fade_out = gain_of(-FADE_DB_PER_S * np.maximum(T - FADE_FROM_S, 0))
    fade_out = fade_out * np.clip((shut_s - T) / 0.013, 0, 1)
    fader = fade_out + ramp(reopen_s, reopen_s + FADE_IN_S)
    band = signal.firwin(2001, EDGE_HZ, window=("kaiser", 10), fs=SR)
    return signal.oaconvolve(dry * fader, band[None], "same")


dry = scene()
out = record(dry)
unload_wav(out)
```